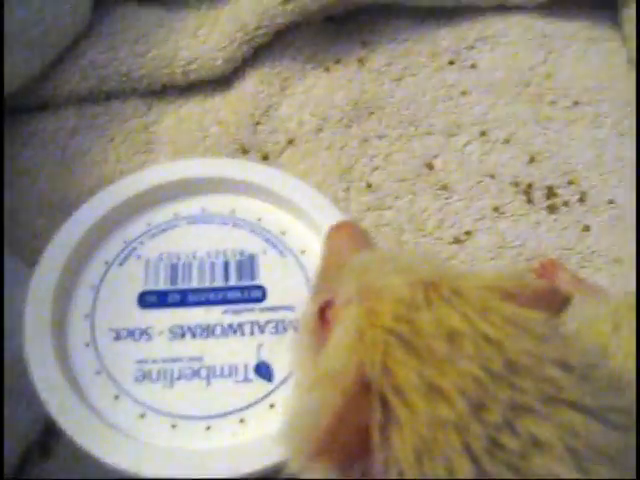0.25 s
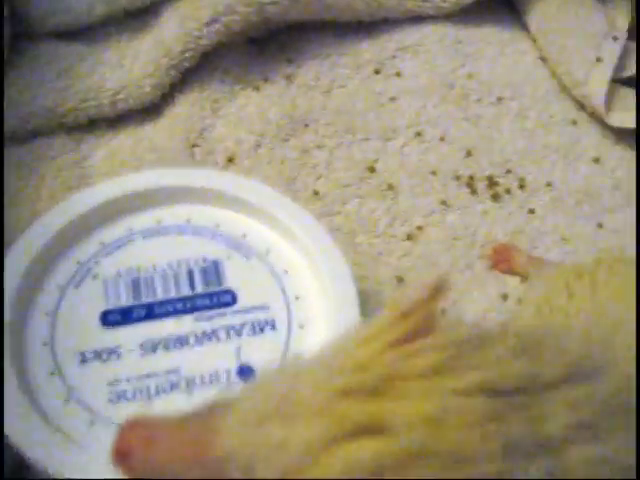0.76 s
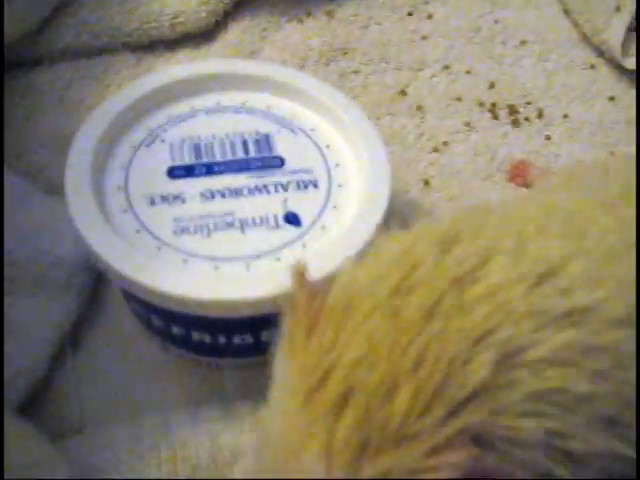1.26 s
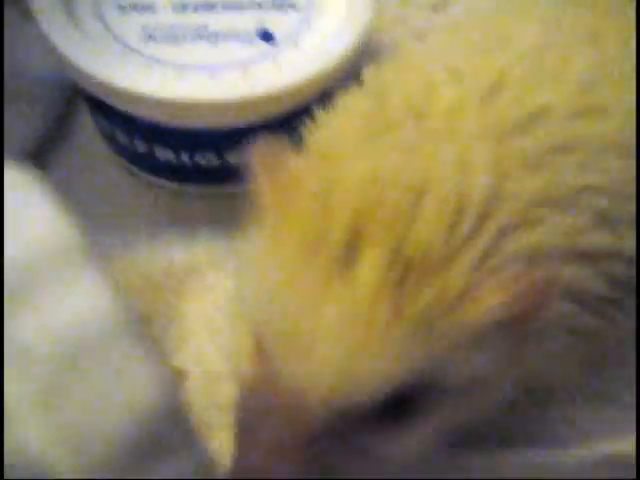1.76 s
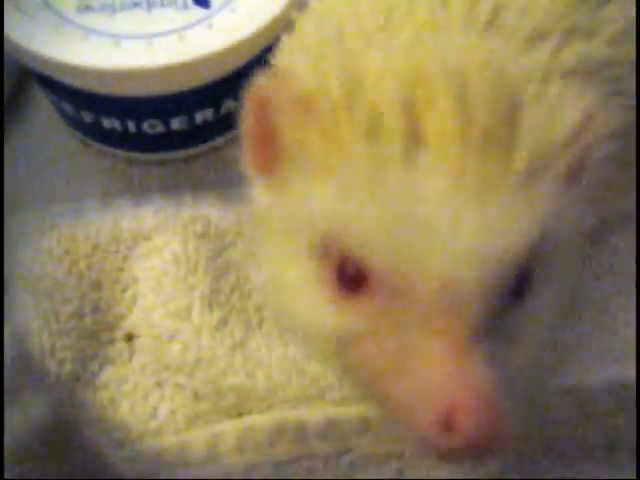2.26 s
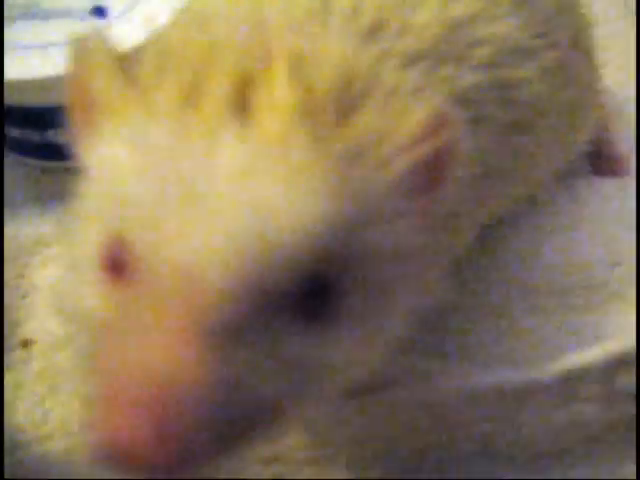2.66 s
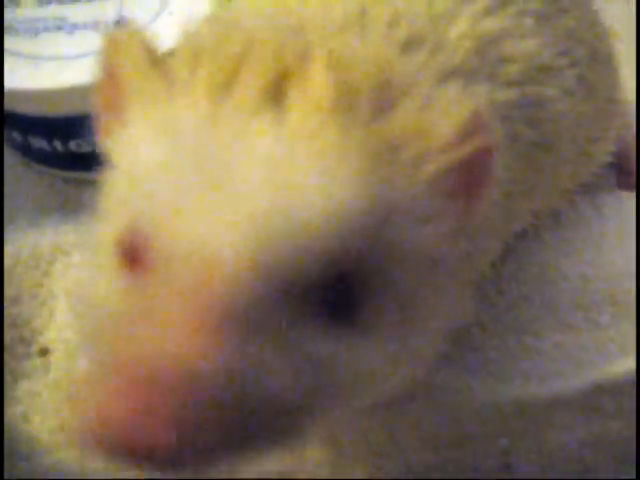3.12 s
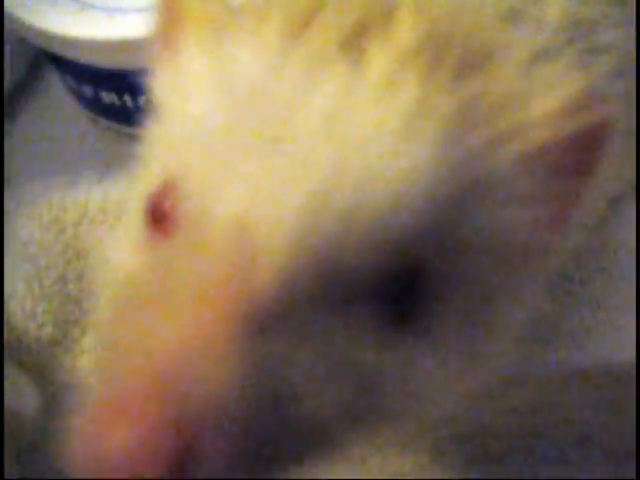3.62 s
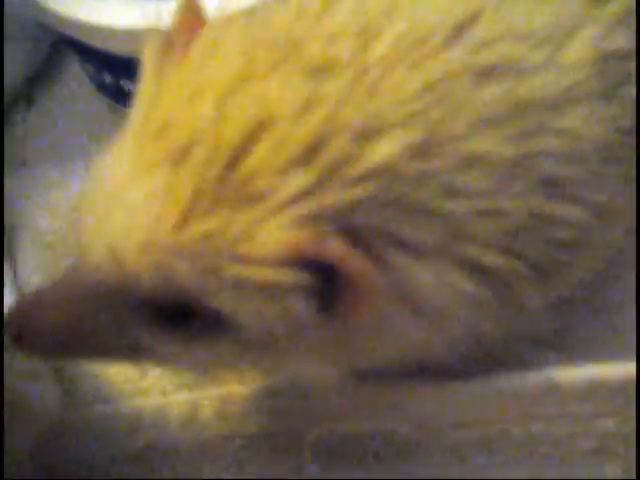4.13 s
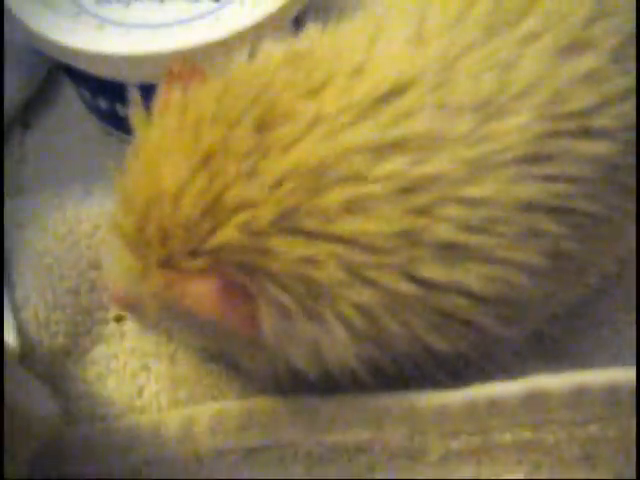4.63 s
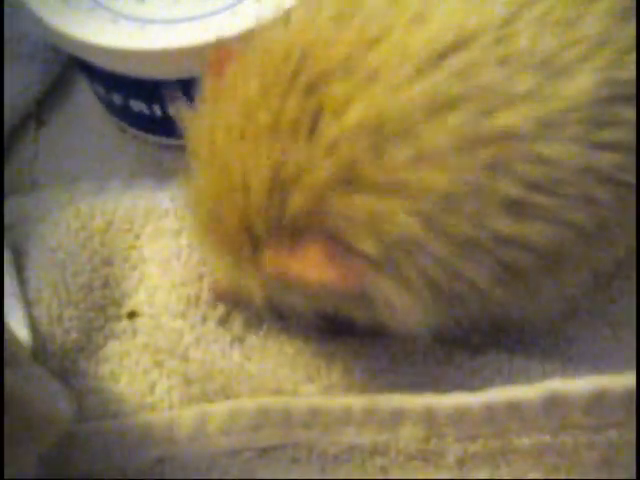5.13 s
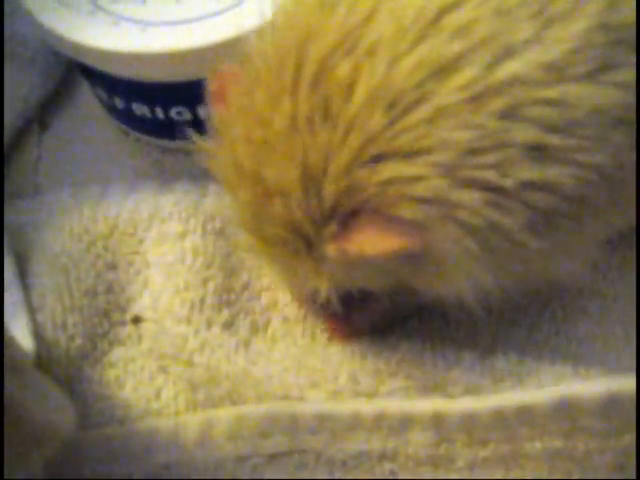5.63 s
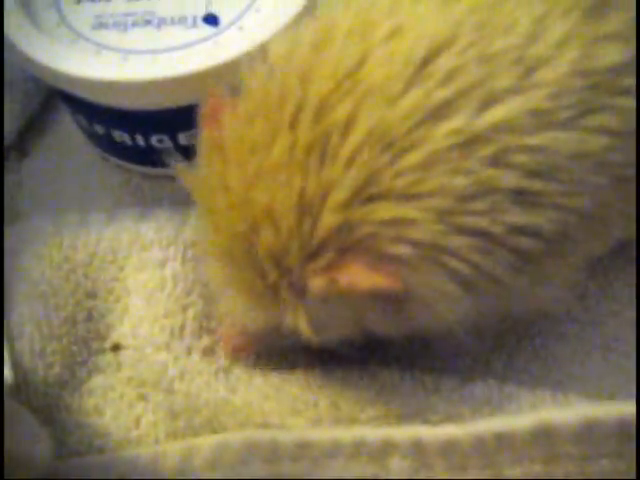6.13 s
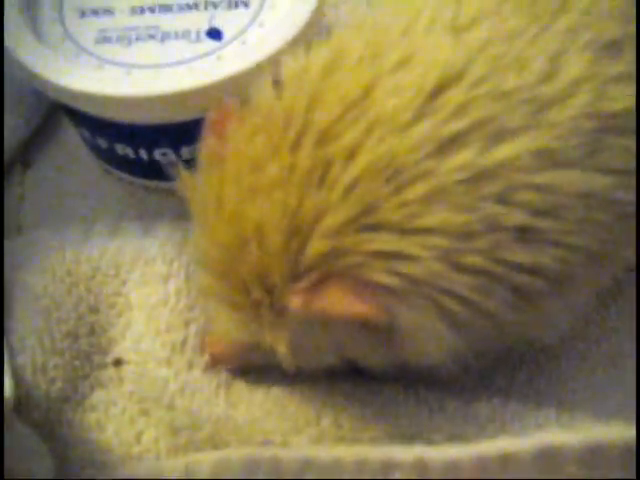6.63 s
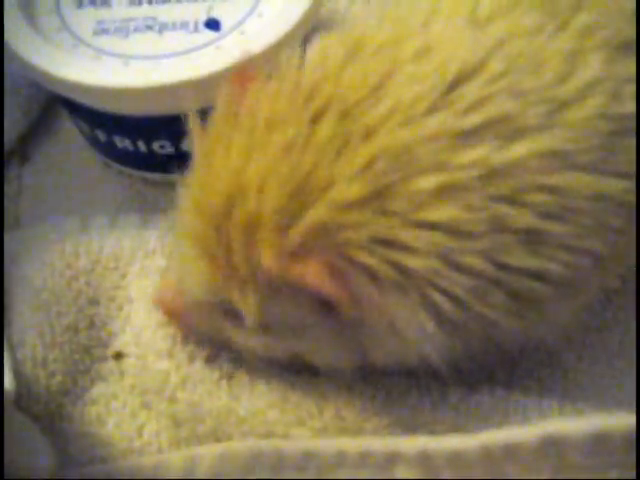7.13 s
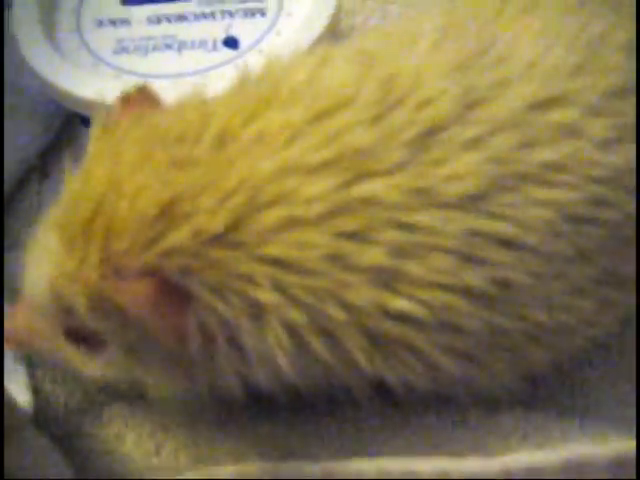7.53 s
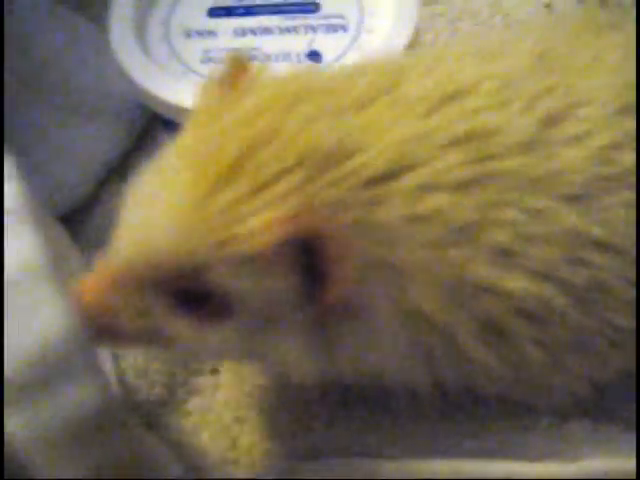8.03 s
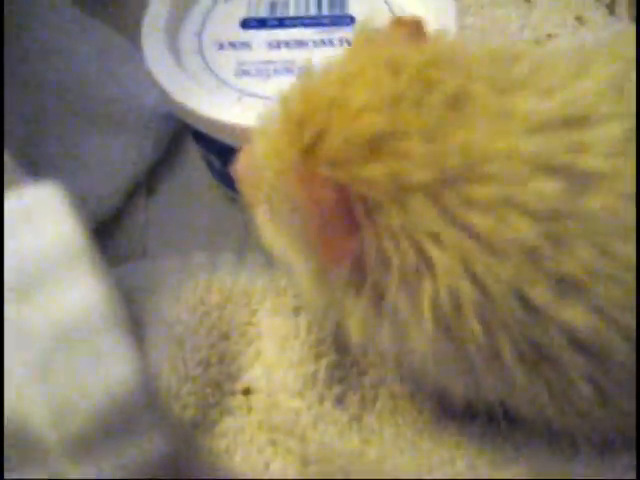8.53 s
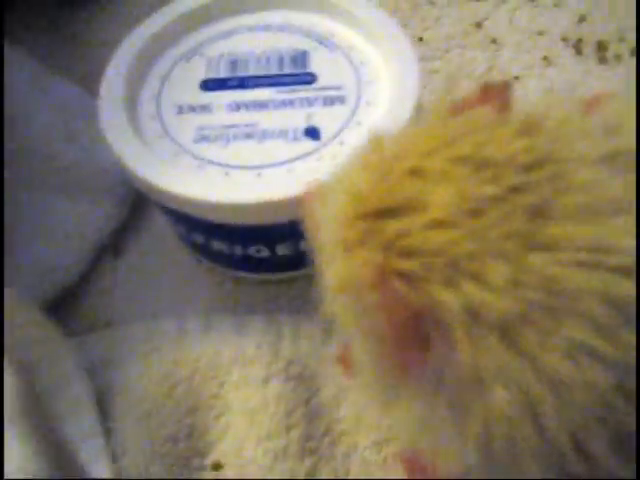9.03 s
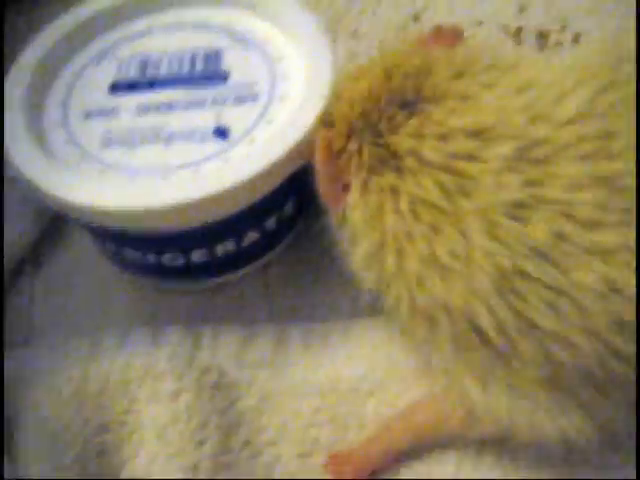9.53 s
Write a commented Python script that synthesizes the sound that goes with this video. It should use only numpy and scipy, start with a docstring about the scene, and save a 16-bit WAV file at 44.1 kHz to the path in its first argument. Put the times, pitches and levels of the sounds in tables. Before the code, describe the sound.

A close, dry, mono camera microphone picks up a hedgehog on a towel in a quiet room, over constant hiss, low hum and a thin, high electronic whine. It begins nearly still, with a knock and small crack at 0.85 s. Crackling starts around 1.4 s and peaks at 1.65-1.8 s in a dense, loud crunch with a soft handling thud. Brittle snaps and gritty grinding continue from 2.1 to 3.4 s, with a strong crack at 2.44 and a dull knock at 3.24. Another crack and low jolt come at 4.05; thin wavering nose whistles and a hoarse wheeze follow at 4.2-4.7. Crisp snaps and hollow knocks land near 4.95. From 5.3 to 7.7 it is sparse, with faint rustle, ticks and taps. A sharp crack at 7.8 brings back rustling, crunches and paw rumbles, busiest at 8.4-8.7, then rapid lens ticks and scuffling until about 9.7.

```python
"""A quiet room: a hedgehog chews and shuffles on a towel right in front of a small hand-held camera.
Shells crack and grind in its jaws (noise grains and snaps through resonances), spines rustle, paws rumble
and knock (filtered noise, decaying sines), its nose wheezes and whistles (noise under wavering sines).
The camera's sensor whines (sines), its lens motor ticks (noise bursts), the hand jolts it twice with low
thuds, and the room hums under the microphone hiss (coloured noise)."""
import sys
import numpy as np
from scipy import signal
from scipy.fft import rfft, irfft
from scipy.io import wavfile
from scipy.ndimage import uniform_filter1d

SR = 44100
rng = np.random.default_rng(int(sys.argv[2]) if len(sys.argv) > 2 else 0)


def to_wav(sig):
    """Store sig (one row per channel, or 1-D mono) as 16-bit WAV at the path in sys.argv[1].

    Samples outside -1..1 are clipped; the rate is SR.
    """
    pcm = np.clip(np.atleast_2d(sig), -1, 1) * 32767
    pcm = np.round(pcm).astype(np.int16)
    wavfile.write(sys.argv[1], SR, pcm.T)  # frames by channels


N = 430857

# Bouts of grinding and rustling. Each row: height in seconds, swell in seconds, fade in seconds,
# nominal treble level in dB, then mouth ring, dull body and brittle top in dB re treble.
BOUTS = [(0.86, .02, .03, -48, -10, -4, 4), (1.05, 0.15, 0.076, -48, -6, 0, 0),
         (1.54, .2, .09, -42, -4, -8, 0), (1.7, .046, 0.021, -19.5, -11.5, -14.5, 0.5),
         (1.755, 0.03, 0.048, -23, -8, -8.5, 0), (1.82, 0.028, 0.24, -36, -6.5, -3, 1),
         (1.97, .13, 0.18, -38.5, -6, -6.5, 2.5), (2.13, .06, .09, -39, -7, -7, 1),
         (2.395, 0.15, 0.027, -29, -6.5, -9, -1), (2.443, 0.017, 0.014, -28.5, -12, -9, -1),
         (2.5, 0.082, 0.074, -40.5, -9, -5, 0), (2.61, 0.032, 0.057, -33.5, 2.5, -9, 2),
         (2.735, 0.037, 0.11, -43, -8, -5, 3), (3.02, .08, 0.038, -37, 3.5, -5, 0.5),
         (3.13, 0.025, 0.13, -36.5, -6.5, -7, -0.5), (3.241, 0.013, 0.02, -22.5, 6, -1, 0.5),
         (3.27, .01, 0.066, -37.5, -5, -19, 0), (3.42, 0.017, 0.12, -36.5, -5, -10, 2),
         (3.555, .07, 0.047, -35, -2.5, -4, 3.5), (4.059, 0.013, .06, -31, -4, -6, 4),
         (4.12, .05, 0.076, -33, -3.5, -8, 5), (4.18, 0.054, 0.076, -34, -7, -8, 3),
         (4.4, 0.23, 0.092, -44.5, -4, -1, 0), (4.614, 0.032, 0.094, -37.5, -5, -2.5, 0),
         (4.965, 0.057, .03, -32.5, -7, 0.5, 3), (5.035, 0.041, 0.077, -43, -7, 0.5, 2),
         (5.225, .015, 0.13, -47, -6, 0, 0), (5.9, .05, .25, -47, -7, -5, 1),
         (6.41, .05, 0.049, -43, -1, -1.5, -2), (6.52, 0.033, .1, -47, -10, -3, 1),
         (6.645, .015, 0.022, -45.5, -8, 3.5, 2), (7.809, 0.012, 0.087, -29, -4.5, -13, 0),
         (7.89, .07, .18, -34, -1.5, -10, 1.5), (8.15, 0.19, .19, -35, -5, -8.5, 3),
         (8.402, .03, 0.054, -29.5, -6, -5, 0.5), (8.47, 0.0053, 0.022, -38, 4, -9, -3),
         (8.545, 0.086, 0.084, -31, -2.5, -4.5, 2), (8.62, 0.086, 0.089, -33.5, -2.5, -1, -1.5),
         (8.708, 0.034, 0.015, -20.5, -1.5, -7, 1), (9.112, .06, 0.11, -37.5, -4, -6.5, -4),
         (9.435, 0.053, 0.12, -38.5, -4, -0.5, -1), (9.6, 0.035, 0.066, -40.5, 3, 6, -1),
         (9.67, 0.069, 0.093, -38.5, 2, 1, 0)]


def undb(db):
    """Decibels to amplitude gain."""
    return 10 ** (np.asarray(db) / 20)


def unit(x):
    """Scale to rms 1."""
    return x / np.sqrt(np.mean(x ** 2))


def ring(x, modes):
    """Sum of two-pole resonances, each applied twice; unit white noise comes out at rms 1."""
    f = np.fft.rfftfreq(N, 1 / SR)
    response = 0
    for hz, width_hz, db in modes:
        damping = 1j * f * width_hz
        response = response + undb(db) * (damping / (hz ** 2 - f ** 2 + damping)) ** 2
    response_rms = np.sqrt(np.mean(np.abs(response) ** 2))
    return irfft(rfft(x) * response / response_rms, N)


def walk(rate_hz):
    """Random levels, one per 1 / rate_hz, joined by straight slews; rms 1."""
    hold = int(SR / rate_hz)
    steps = np.repeat(rng.standard_normal(N // hold + 1), hold)
    return unit(uniform_filter1d(steps, hold)[:N])


def bursts(at_s, size, t60_s, rise_s):
    """Envelope of bursts that build up over rise_s and decay by 60 dB in t60_s."""
    env = np.zeros(N)
    for at, peak, decay_s in zip(at_s, size, np.maximum(t60_s, .003)):
        t = np.arange(-rise_s, decay_s, 1 / SR)
        i = int((at - rise_s) * SR)
        shape = peak * np.where(t < 0, (1 + t / rise_s) ** 2, undb(-60 * t / decay_s))
        env[i:i + len(t)] += shape[:N - i]
    return env


def grains(per_s, spread_db, t60_s):
    """Envelope of tiny decaying fractures at random moments, a few much larger than the rest; rms 1."""
    size = undb(spread_db * np.minimum(rng.exponential(1, N), 3.5))
    hits = (rng.random(N) < per_s / SR) * size
    return unit(signal.lfilter([1], [1, -undb(-60 / (t60_s * SR))], hits))


def swells(rows):
    """Envelope of sounds that swell and fade straight in dB; rows (height s, swell s, fade s, dB)."""
    edge_db, close_s = -11.5, 0.0035  # ends re height; time to fall silent beyond them
    env = np.zeros(N)
    for at, rise_s, fall_s, db in rows:
        rise_s, fall_s = max(rise_s, .002), max(fall_s, .002)
        start = max(int((at - rise_s - close_s) * SR), 0)
        stop = min(int((at + fall_s + close_s) * SR), N)
        i = np.arange(start, stop)
        t = i / SR - at
        gate = np.interp(t, [-rise_s - close_s, -rise_s, fall_s, fall_s + close_s], [0, 1, 1, 0])
        slope_db = np.interp(t, [-rise_s, 0, fall_s], [edge_db, 0, edge_db])
        env[i] = np.hypot(env[i], gate * undb(db + slope_db))
    return env


def room():
    """Steady coloured hiss with a hum of distant machines; the level wavers a little."""
    # Each row: frequency in Hz, relative density in dB per Hz.
    hiss_curve = [(20, -20), (55, -4), (103, -8.5), (165, 4), (230, -8), (320, -11), (500, -13.5),
                  (630, -10.5), (1420, -12.5), (2330, -17.5), (6800, -25), (8250, -15.5), (9000, -22),
                  (11800, -30), (15800, -36)]
    hiss_db = -46
    hz, db = np.transpose(hiss_curve)
    f = np.fft.rfftfreq(N, 1 / SR) + 1  # keeps the log finite
    colour = undb(np.interp(np.log(f), np.log(hz), db))
    hiss = irfft(rfft(rng.standard_normal(N)) * colour, N)
    return unit(hiss) * undb(hiss_db + .5 * walk(2.7))


def camera():
    """Sensor whine: a line tone restarted each frame, hence a comb, and a tone flipping sign each frame."""
    frame_hz, line_hz, screen_hz = 30., 7569.5, 7867.
    line_db, overtone_db, screen_db = -50, -71, -58.5  # rms
    t = np.arange(N) / SR
    scan = 2 * np.pi * line_hz * (t % (1 / frame_hz))
    flip = (-1.) ** np.floor(t * frame_hz)
    line = undb(line_db) * np.sin(scan) + undb(overtone_db) * np.sin(2 * scan)
    screen = undb(screen_db) * flip * np.sin(2 * np.pi * screen_hz * t)
    return np.sqrt(2) * (line + screen)


def effort(bout_db, rustle_db):
    """Gain of grinding bouts over a faint spine rustle for one group of resonances; dB re treble."""
    # Each row: time in seconds, nominal treble level in dB.
    rustle = [(0, -62), (0.8, -58), (1.3, -52), (2.2, -47), (3.0, -49.5), (3.65, -51), (4.0, -48.5),
              (4.5, -51), (5.5, -52), (6.3, -57), (6.8, -52.5), (7.55, -51), (7.78, -45), (8.36, -43.5),
              (8.75, -61), (9.05, -44), (9.35, -48), (9.77, -44)]
    rows = np.array(BOUTS)[:, :4] + np.outer(bout_db, [0, 0, 0, 1])
    level_db = np.interp(np.arange(N) / SR, *np.transpose(rustle))
    return np.hypot(swells(rows), undb(level_db + rustle_db))


def chewing():
    """Grinding grains and single cracks of shell shake the same four groups of resonances."""
    # Louder cracks and smacks. Each row: main snap in seconds, nominal peak in dB,
    # mouth ring in dB re peak, brittle top in dB re peak.
    cracks = [(0.8487, -28.5, -2, -3), (1.376, -26, -8, -4), (1.5452, -26, -10, -9),
              (1.6548, -20, -20, -13), (1.6812, -13, -17, -14), (1.695, -11, -14, -11),
              (1.7364, -10, -8, -3), (1.7525, -9.5, -11, -13), (1.763, -7, -20, -17),
              (1.7742, -17, -16, -12), (2.1024, -27, -7, -9), (2.1107, -27, -14, -7),
              (2.1592, -28, -18, -4), (2.4031, -22, -13, -14), (2.4409, -11, -20, -5.5),
              (2.5279, -17.5, -17, -7), (2.532, -20, -20, -4), (2.5837, -20.5, -16, -3),
              (2.6637, -23.5, -14, 0), (2.7265, -24, -11, -2), (2.7355, -21, -6, -2),
              (2.7565, -18.5, -10, -3), (2.7904, -27, -12, -3), (2.944, -24, -17, -10),
              (3.0033, -28, -1, -15), (3.0603, -27, -17, -2), (3.1191, -30, -11, -3),
              (3.2009, -21.5, 2, -5), (3.4097, -31, -19, 0), (3.423, -27, -4, -11), (4.0566, -16.5, -8, -3),
              (4.1041, -27, -8, -2), (4.614, -28, -7, -1), (4.6593, -29, -12, -4), (4.944, -18, -22, -1),
              (4.9518, -20, -12, 2), (4.9713, -21.5, -24, 5.5), (5.222, -33, -17, -5),
              (5.9894, -29.5, -7, -4), (6.6463, -31.5, -20, 5), (6.87, -32, -6, -7), (7.0218, -32, -8, -12),
              (7.8078, -14, -7, -9), (8.4005, -21, -12, -7), (8.416, -19.5, 0.5, -7),
              (8.4676, -21, -0.5, -7), (8.516, -25, -13, 2), (8.5458, -25, -4, 0), (8.6818, -18, -9, -5),
              (8.7019, -20, -7, -2), (9.0186, -30, -5, -17), (9.1088, -20, -7, -15), (9.194, -27, -8, -12),
              (9.428, -23, -18, -15), (9.6648, -25, -7, -13)]
    # Resonances of jaw, mouth, camera shell and breaking shell.
    # Each row: frequency in Hz, width in Hz, relative level in dB.
    body = [(779, 546, 1), (1382, 220, 0), (1746, 275, 2)]
    mouth = [(3930, 990, -2), (2982, 500, -4.5)]
    crisp = [(2780, 430, -5.5), (5103, 500, 1), (5327, 510, 5), (6400, 860, 6.5), (7670, 980, 8.5),
             (8170, 640, 7)]
    brittle = [(9550, 1400, 4.5), (10480, 1730, -3), (14900, 14000, -22)]
    rustle_mouth_db, rustle_body_db = -6, -6.5  # re treble
    small_per_s, small_db, small_spread_db = 9, 9, 3
    thud_db_at_25, thud_db_per_db = -11.5, -0.18  # re peak, at a -25 dB peak; louder cracks are drier
    patchy_db = 2.2

    mouth_db, body_db, brittle_db = np.transpose(BOUTS)[4:]
    treble = effort(0 * mouth_db, 0)

    # small cracks fall at random, their level following the grinding around them
    chance = rng.random((int(small_per_s * N / SR), 4))
    small_s = .01 + chance[:, 0] * (N / SR - .02)
    around_db = 20 * np.log10(treble[(small_s * SR).astype(int)])
    small_peak_db = around_db + small_db + small_spread_db * (2 * chance[:, 1] - 1)
    small_ring_db = -16 + 12 * chance[:, 2]
    small_top_db = -13 + 10.5 * chance[:, 3]
    small = np.column_stack([small_s, small_peak_db, small_ring_db, small_top_db])
    at_s, peak_db, ring_db, top_db = np.concatenate([cracks, small]).T
    thud_db = thud_db_at_25 + thud_db_per_db * (peak_db + 25)

    patches = undb(patchy_db * walk(40))
    grind = rng.standard_normal(N) * unit(0.89 + grains(800, 2.0, 0.0075) * patches)
    # a crack is one main snap inside a cluster of smaller ones
    splinters = rng.standard_normal(N) * unit(.5 + grains(2500, 5.6, 0.001))

    # the brightness of the grinding drifts at random
    top_drift = undb(-6.5 + 1.7 * walk(6))
    # (modes, grinding gain, cracks dB, main snap dB)
    groups = [(crisp, treble * undb(-3.5), -3.5, 24),
              (brittle, effort(brittle_db, 0) * top_drift, top_db - 1.5, 24),
              (mouth, effort(mouth_db, rustle_mouth_db) * undb(-3.5), ring_db - 0.5, 21),
              (body, effort(body_db, rustle_body_db) * undb(-5.0), thud_db - 1.0, 19.5)]
    out = 0
    for modes, gain, crack_db, snap_db in groups:
        size = undb(peak_db + crack_db - 10.5)
        cluster = bursts(at_s, size, np.full(len(at_s), .011), 0.0039)
        shake = grind * gain + splinters * cluster
        shake[(at_s * SR).astype(int) - 14] -= size * undb(snap_db)  # main snap
        out = out + ring(shake, modes)
    return out


def paws():
    """Soft low rumble of paws shuffling on the towel: patchy noise through floor resonances."""
    # Each row: height in seconds, swell in seconds, fade in seconds, nominal level in dB.
    shuffles = [(0.3, .06, .4, -56), (0.85, 0.032, .3, -48), (1.78, 0.11, 0.39, -40),
                (2.4, .1, 0.72, -47.5), (3.245, 0.05, .05, -44), (3.58, 0.32, 0.062, -48),
                (8.575, .07, 0.082, -39), (8.68, .06, 0.057, -36.5), (9.14, 0.13, 0.095, -41),
                (9.62, 0.28, 0.13, -39)]
    # Each row: frequency in Hz, width in Hz, relative level in dB.
    floor_modes = [(246, 149, 0.5), (356, 84, -6)]
    shifting_db = -54  # small moves of weight all the time
    steps = np.hypot(swells(shuffles), undb(shifting_db))
    patches = undb(2.4 * walk(25) - 4.5)
    return ring(rng.standard_normal(N) * steps * patches, floor_modes)


def knocks():
    """Paws and snout knock tub and floor: each blow rings a few hollow modes, decaying sines."""
    # Each row: time in seconds, nominal peak in dB, lowest mode in Hz, its t60 in seconds, upper modes in dB.
    blows = [(0.845, -21.5, 372, 0.057, 5.5), (1.733, -49, 730, 0.07, 7), (2.437, -31, 644, 0.055, 0),
             (3.199, -28.5, 285, 0.07, -3), (3.239, -18.5, 278, 0.081, -15), (4.05, -30, 265, 0.076, -8),
             (4.759, -28, 620, 0.07, -3), (4.939, -27, 512, 0.15, 4.5), (4.968, -26, 518, 0.16, 2),
             (6.642, -32, 620, 0.063, -5.5), (7.067, -41, 593, 0.06, 16), (7.443, -25, 736, 0.041, -10),
             (7.805, -23.5, 265, 0.054, 1.5), (8.411, -24.5, 683, 0.07, -2), (8.569, -20.5, 250, 0.072, -3),
             (8.684, -30, 268, 0.07, -1)]
    # Each row: multiple of the lowest mode, level in dB, share of its t60.
    tub_modes = [(1, -2.5, 1), (2.2, 0, 0.16), (2.8, -7, 0.4), (3.8, -8.5, 0.35), (6.5, -5.5, .1)]
    out = np.zeros(N)
    for at, peak_db, hz, t60_s, upper_db in blows:
        t = np.arange(int(t60_s * SR)) / SR
        blow = 0
        for multiple, db, share in tub_modes:
            level_db = db + (multiple > 1.5) * upper_db - 60 * t / (share * t60_s)
            blow = blow + undb(level_db) * np.sin(2 * np.pi * multiple * hz * t)
        i = int((at + 0.00238) * SR)
        out[i:i + len(t)] -= undb(peak_db - 6.5) * blow
    return out


def lens():
    """Lens motor: short dry noise bursts high in the treble, alone or in nearly even runs."""
    # Each row: time in seconds, nominal peak in dB.
    lone_ticks = [(0.8669, -34), (0.877, -32), (1.038, -35), (1.4182, -32), (2.0607, -25.5), (2.1228, -28),
                  (2.909, -30), (3.0899, -26.5), (3.175, -27), (3.3485, -25), (3.3792, -29), (3.9888, -33),
                  (5.8765, -35), (6.4418, -30), (6.6987, -29), (7.6969, -35), (8.2437, -31)]
    # Each row: first tick in seconds, gap in seconds, number of ticks, nominal peak in dB.
    runs = [(3.824, .0625, 4, -32), (4.2557, .0595, 4, -34), (8.736, .0532, 16, -29.5)]
    # Each row: frequency in Hz, width in Hz, relative level in dB.
    tick_modes = [(8050, 4500, 18), (10000, 1500, 5), (13000, 2400, -18)]
    jitter_s, spread_db = .002, 2.
    rebound_share, rebound_db = 0.51, -7.5  # weaker tick this share of the gap after each step of a run

    rows = list(lone_ticks)
    for first_s, gap_s, count, db in runs:
        chance = rng.standard_normal((count, 2))
        steps_s = first_s + gap_s * np.arange(count) + jitter_s * chance[:, 0]
        steps = list(zip(steps_s, db + spread_db * chance[:, 1]))
        rows += steps
        rows += [(s + rebound_share * gap_s, step_db + rebound_db) for s, step_db in steps]
    at_s, peak_db = np.transpose(rows)
    env = bursts(at_s + 0.00075, undb(peak_db - 2), np.full(len(at_s), .009), 0.00065)
    return ring(rng.standard_normal(N) * env, tick_modes)


def hand():
    """The hand jolts the camera: swells of noise thud through a low resonance of its body."""
    # Each row: height in seconds, swell in seconds, fade in seconds, level in dB.
    jolts = [(1.74, 0.053, 0.071, -47), (4.055, .015, 0.062, -43)]
    # Each row: frequency in Hz, width in Hz, relative level in dB.
    shell_modes = [(75, 86, 0)]
    return ring(rng.standard_normal(N) * swells(jolts), shell_modes)


def sing(tone, waver, flutter_db):
    """A thin sine whose pitch and level shake at random about a drawn track."""
    t = np.arange(N) / SR
    s, hz, db = np.transpose(tone)
    fade = np.interp(t, [s[0] - .01, s[0], s[-1], s[-1] + .01], [0, 1, 1, 0])
    pitch_hz = np.interp(t, s, hz) * (1 + waver * walk(150))
    phase = 2 * np.pi * np.cumsum(pitch_hz) / SR
    level = undb(np.interp(t, s, db) + flutter_db * walk(70))
    return np.sqrt(2) * fade * level * np.sin(phase)


def nose():
    """Air through narrow nostrils sings several clear tones over a hoarse one, resonant noise."""
    # One table a tone. Each row: time in seconds, pitch in Hz, level in dB.
    whistle_tones = [
        [(4.26, 1493, -57), (4.274, 1510, -43), (4.292, 1456, -35.5), (4.396, 1397, -45), (4.468, 1374, -55),
         (4.482, 1475, -43), (4.5, 1437, -58)],
        [(4.35, 3530, -71), (4.366, 3430, -47), (4.41, 3410, -55), (4.44, 3569, -40), (4.458, 3575, -40),
         (4.59, 3420, -62), (4.62, 3400, -49)],
        [(4.19, 2070, -61), (4.21, 2251, -48), (4.262, 2040, -52), (4.272, 2145, -55), (4.28, 2109, -56)],
        [(4.2, 3082, -56), (4.204, 3100, -48), (4.256, 3120, -64), (4.27, 3130, -63)],
        [(4.3, 2200, -57), (4.34, 2270, -47), (4.382, 2360, -57), (4.402, 2230, -57), (4.514, 2310, -55),
         (4.55, 2331, -64)],
    ]
    # Each row: height in seconds, swell in seconds, fade in seconds, nominal level in dB.
    wheezes = [(4.5, .22, .03, -42), (4.56, 0.018, .03, -40.5), (4.645, .035, .07, -47)]
    # Each row: frequency in Hz, width in Hz, relative level in dB.
    nostril_modes = [(1870, 100, 0), (2020, 110, -1)]
    whistle = sum(sing(tone, waver=.003, flutter_db=1.2) for tone in whistle_tones)
    air = rng.standard_normal(N) * swells(wheezes)
    return whistle + ring(air, nostril_modes) * undb(-3.0)


def scene():
    """Everything at the one microphone."""
    steady = room() + camera()
    animal = chewing() + paws() + knocks() + nose()
    handling = lens() + hand()
    return (steady + animal + handling)[None]


def record(dry):
    """The recorder cuts the top with a steep elliptic low-pass."""
    top_hz = 15850
    lowpass = signal.ellip(10, .2, 80, top_hz, fs=SR, output="sos")  # .2 dB ripple, 80 dB stop
    return signal.sosfilt(lowpass, dry)


dry = scene()
out = record(dry)
to_wav(out)
```